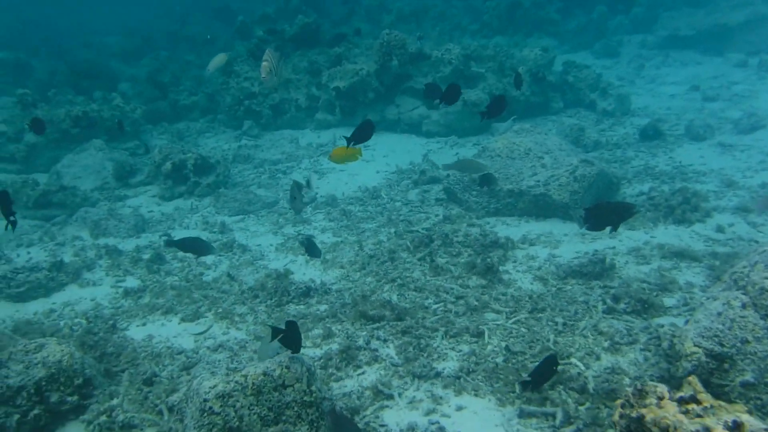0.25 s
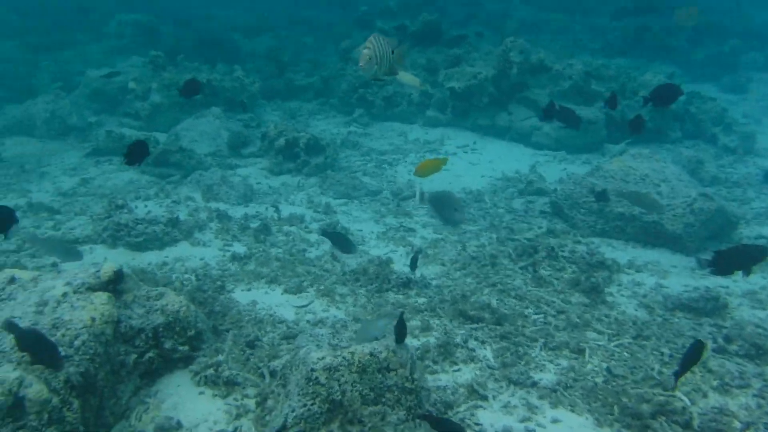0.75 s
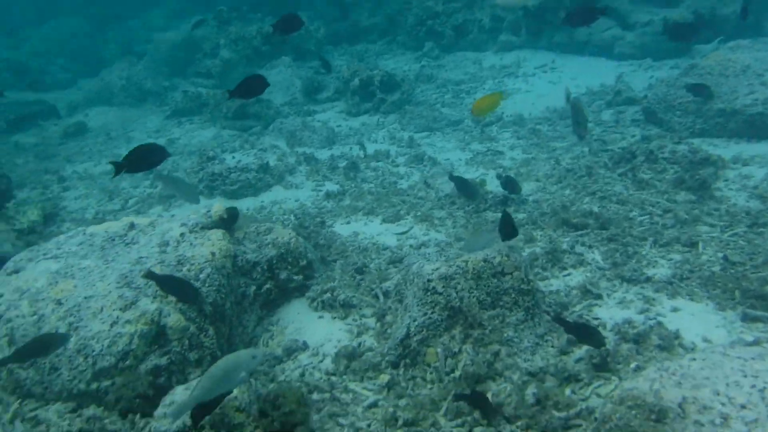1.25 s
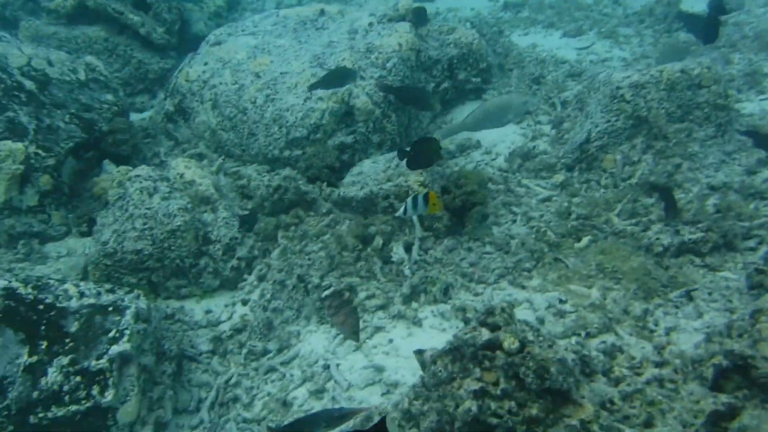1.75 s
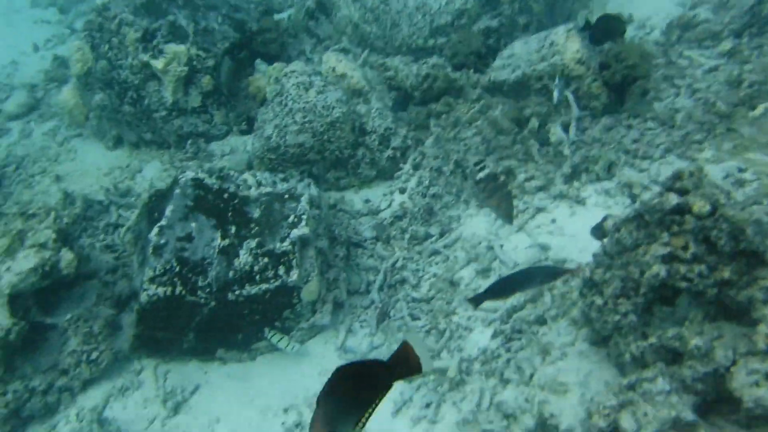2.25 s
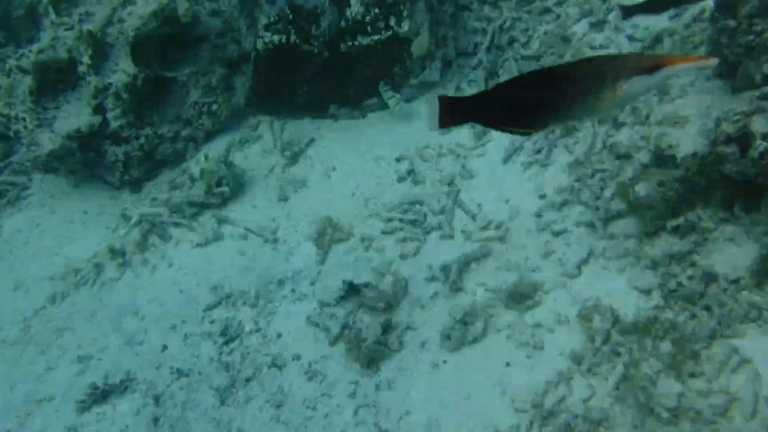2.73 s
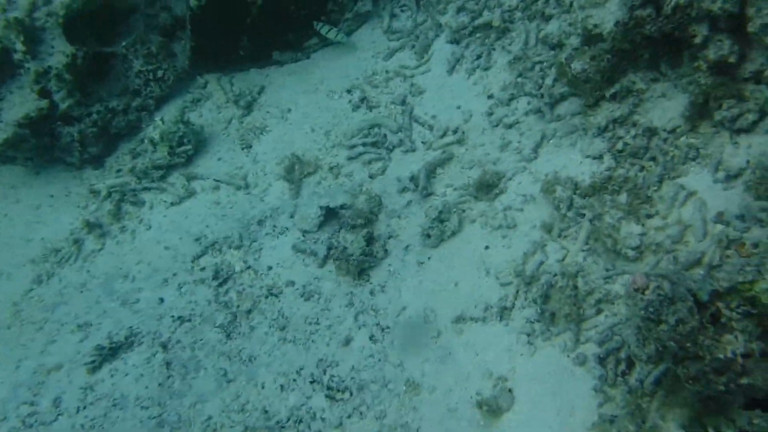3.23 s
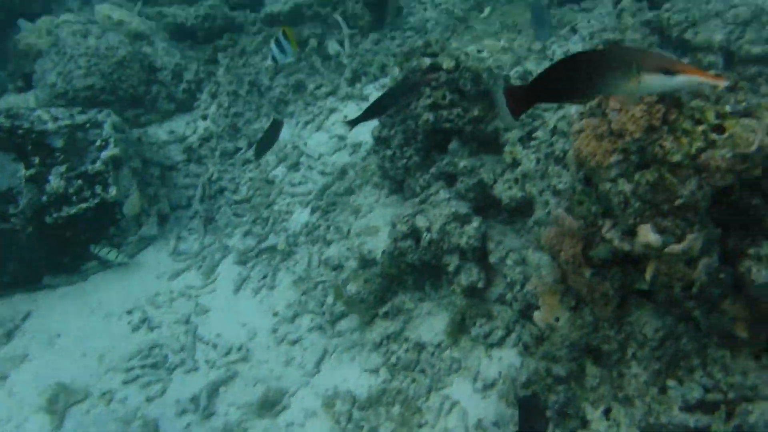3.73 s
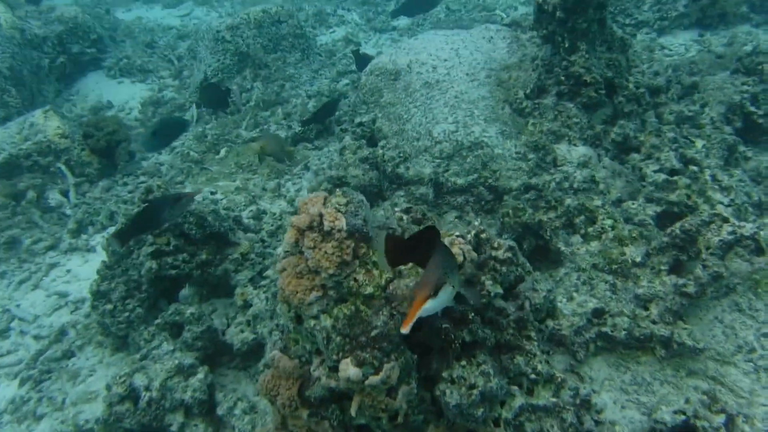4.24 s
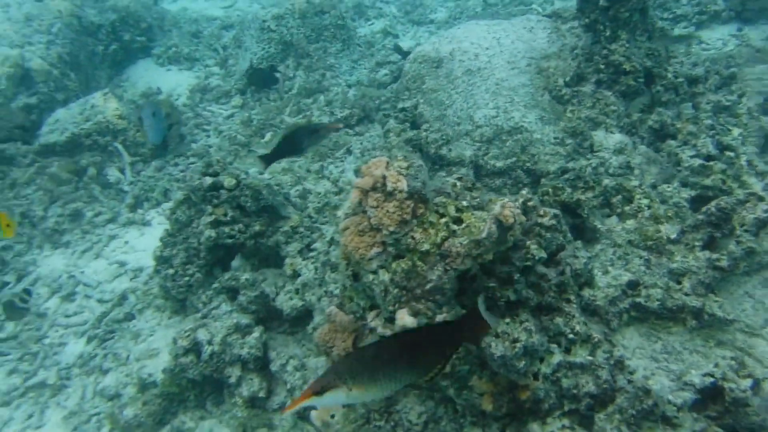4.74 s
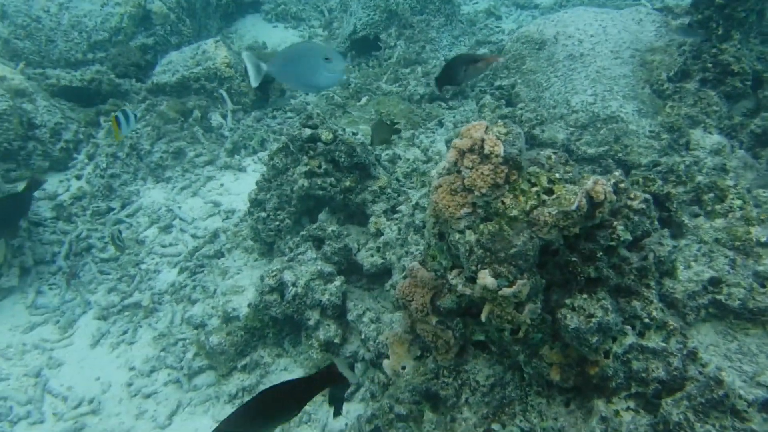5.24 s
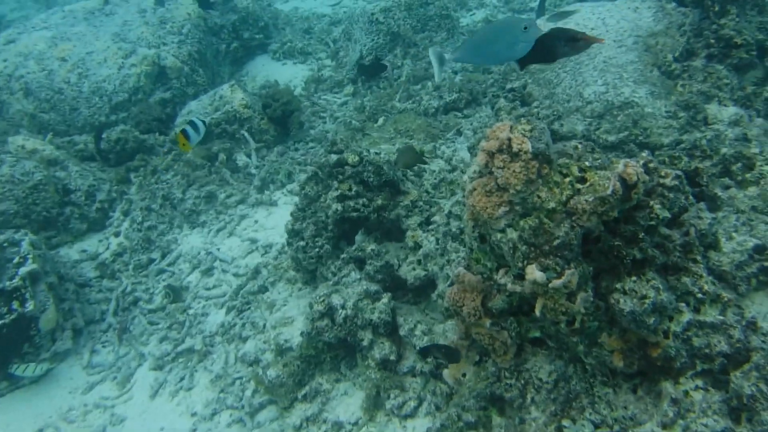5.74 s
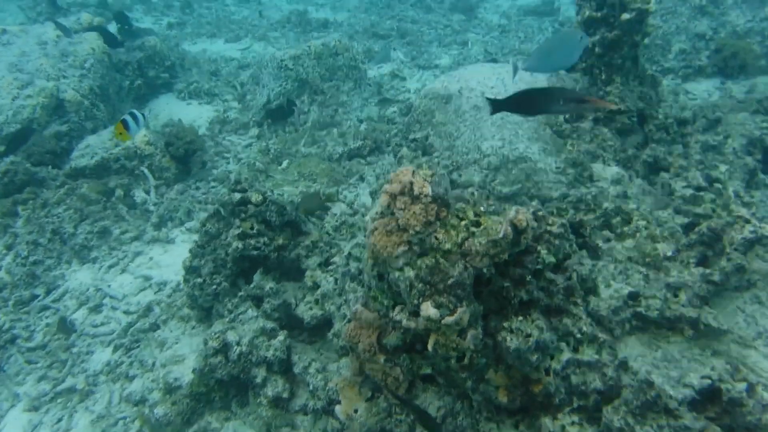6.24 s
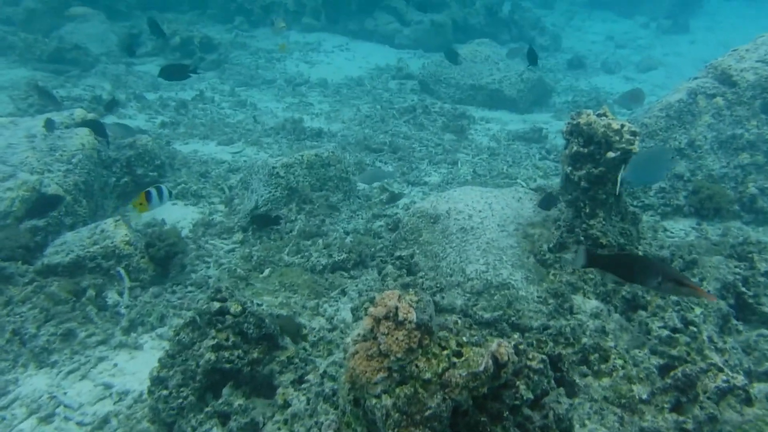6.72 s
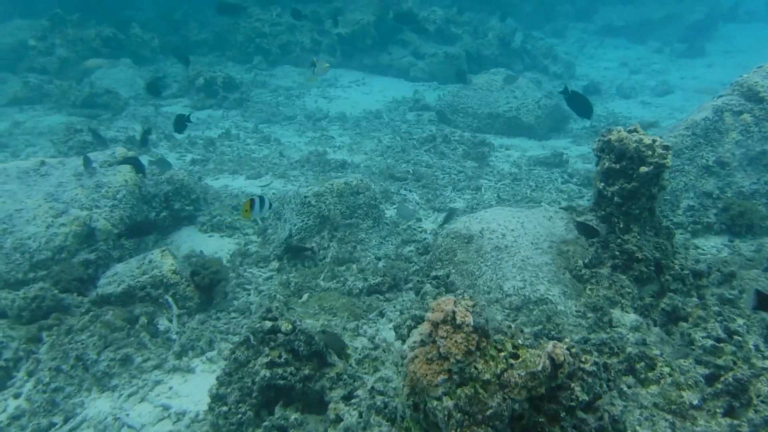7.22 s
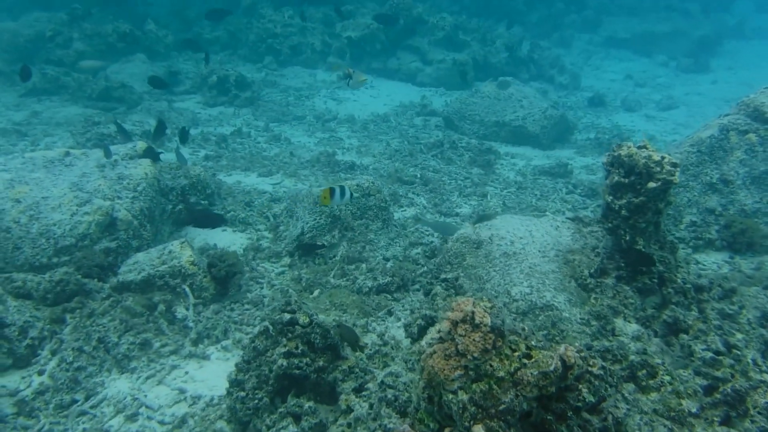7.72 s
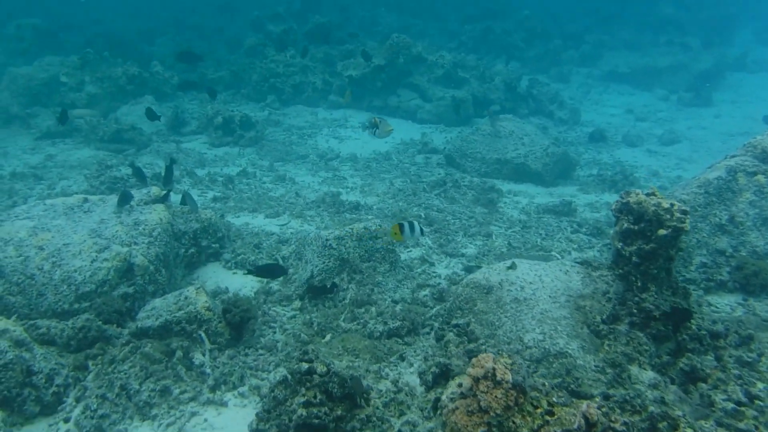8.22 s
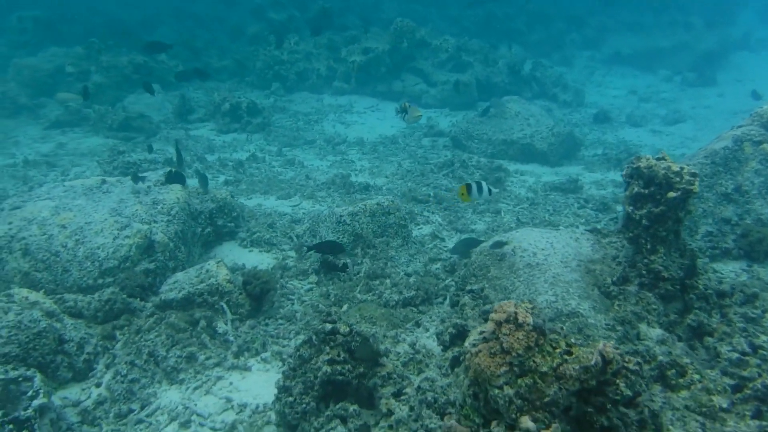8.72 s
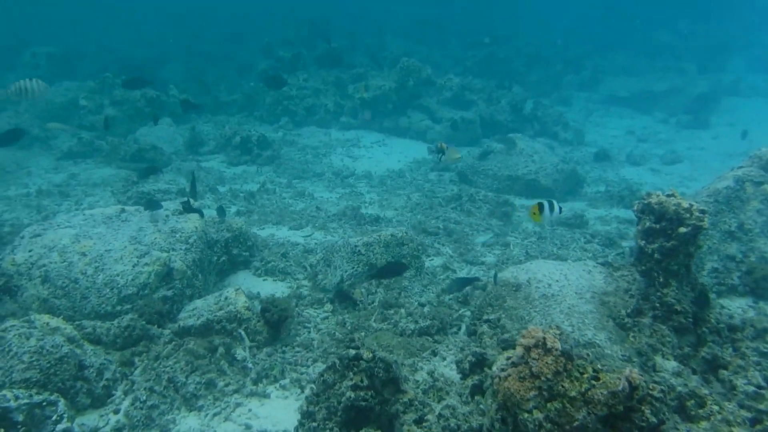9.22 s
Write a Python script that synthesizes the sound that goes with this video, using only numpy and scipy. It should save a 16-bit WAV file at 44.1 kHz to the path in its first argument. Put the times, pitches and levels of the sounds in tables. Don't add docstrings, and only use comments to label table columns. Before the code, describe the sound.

The microphone is sealed inside a camera case underwater, so everything is close, dull and bass-heavy. A lumpy low rumble and a wavering hollow hum, strongest around 330 to 360 Hz, run throughout. A soft shove comes at 0.6 seconds, a small glug at 1.1, and stronger thumps with air knocks from 2.1 to 2.5. At 3.16 a hard double tap clicks on the shell; heavy, overloading blows follow at 3.3 to 3.5, while a grip rubs and slips until 3.9 among bubbling tones. Low swells continue past 4.3. A big blow and deep resonant gulp land at 5.2 to 5.3, then clustered thuds at 6.0 to 6.3. Another boom hits at 7.3, followed by a calmer hum until thumps and a short glug near 9.0, with a smaller one at 9.24. Sparse shrimp snaps, distant crackle, faint hiss and thin whine persist.

```python
import sys
import numpy as np
from scipy import signal
from scipy.fft import rfft, irfft, next_fast_len
from scipy.io import wavfile
from scipy.ndimage import uniform_filter1d

SR = 44100
rng = np.random.default_rng(int(sys.argv[2]) if len(sys.argv) > 2 else 0)


def unload_wav(signal):
    wavfile.write(
        sys.argv[1],
        SR,
        np.round(np.clip(np.atleast_2d(signal).T, -1, 1) * 32767).astype(np.int16),
    )


def makeup_ratio(level_db):
    decades = np.asarray(level_db, float) / 20
    return 10 ** decades


N = 417625
CEILING = 0.83

# start_s, surge_db (large eddies), churn_db (small eddies)
WATER_FLOW = [(0.0, -24.5, -33), (0.7, -29, -47), (1.1, -26.5, -29.5), (1.5, -25, -32), (1.95, -24, -32.5),
              (2.75, -24.5, -37), (3.0, -26.5, -35), (3.6, -22.5, -33.5), (4.3, -20, -32.5),
              (4.9, -23, -39), (5.15, -27, -32), (5.6, -24.5, -26), (5.95, -22, -32.5), (6.55, -28.5, -37),
              (7.4, -18, -32.5), (7.9, -25.5, -44.5), (8.7, -23.5, -41), (9.47, -26, -40.5)]


def evened(x):
    return x / np.sqrt(np.mean(x ** 2) + 1e-20)


def columns(rows):
    s, *values = np.transpose(rows)
    return [np.interp(np.arange(N) / SR, s, v) for v in values]


def add(mix, start_s, sound):
    part = mix[round(start_s * SR):][:len(sound)]
    part += sound[:len(part)]


def lumps(depth_db, ms):
    span = max(int(ms * SR / 1000), 2)
    wander = uniform_filter1d(uniform_filter1d(rng.standard_normal(N), span), span)
    return makeup_ratio(depth_db * evened(wander))


def gusty(depth_db, ms):
    return rng.standard_normal(N) * lumps(depth_db, ms)


def coloured(x, points):
    lower = (points[0][0] / 2, -80)
    upper = (points[-1][0] * 0.99, -90)
    f, db = np.transpose([lower] + list(points) + [upper])
    size = next_fast_len(N)
    hz = np.fft.rfftfreq(size, 1 / SR)
    gain = makeup_ratio(np.interp(np.log(hz + 1), np.log(f + 1), db))
    return evened(irfft(rfft(x, size) * gain, size)[:N])


def resonate(x, hz, width_hz):
    r = np.exp(-np.pi * width_hz / SR)
    if np.ndim(hz) == 0:
        turn = 1
        pole = r * np.exp(2j * np.pi * hz / SR)
    else:
        turn = np.exp(2j * np.pi * np.cumsum(hz) / SR)
        pole = r
    smooth = signal.lfilter([(1 - r) ** 2], [1, -2 * pole, pole ** 2], x / turn + 1e-18)
    return 2 * (turn * smooth).real


def ring(hz, t60_s, rise_s, bend=0.):
    t = np.arange(int(1.3 * t60_s * SR) + 50) / SR
    shape = (1 - np.exp(-t / rise_s)) * makeup_ratio(-60 * t / t60_s)
    return shape / shape.max() * np.sin(2 * np.pi * hz * t * (1 + bend * t / t60_s))


def flow():
    # start_s, signed_peak, pitch_hz
    shove_rows = [(0.608, -0.44, 43.7), (1.593, 0.31, 45), (2.086, 0.5, 71), (2.314, 0.67, 65.6),
                  (2.355, -0.36, 27), (2.433, -0.69, 40), (2.454, 0.38, 37), (3.251, 0.59, 52.5),
                  (3.291, 0.39, 45.7), (3.313, 0.83, 59), (3.396, 0.093, 56), (3.416, -0.95, 75),
                  (3.489, -0.67, 59), (4.338, -0.55, 28), (4.469, 0.33, 31), (4.693, 0.69, 41),
                  (5.036, 0.31, 54.6), (5.239, -0.8, 77.7), (6.007, -0.33, 44.5), (6.048, 0.35, 44),
                  (6.102, -0.29, 54), (6.132, 0.84, 51.6), (6.168, -0.62, 57.4), (6.286, -0.81, 62),
                  (6.325, 0.41, 73), (7.147, -0.48, 44), (7.314, 1, 57), (8.829, 0.51, 55),
                  (8.993, -0.52, 77.6), (9.237, 0.29, 47.6)]
    # start_s, signed_peak, pitch_hz, swings
    rock_rows = [(0.5, 0.25, 24, .5), (3.22, -0.29, 39.4, 0.88), (3.271, 0.31, 48, 0.54),
                 (3.45, -0.34, 62.7, 1.8), (5.8, -0.16, 36, 1), (6.071, -0.35, 41, 0.54),
                 (6.114, -0.27, 98, 1.2), (6.203, 0.32, 53, 0.89), (3.93, 0.23, 30, 0.66),
                 (8.4, 0.26, 35, 0.43), (2.925, 0.2, 36, .5), (2.275, -0.3, 37, .5), (2.393, -.23, 49, .4),
                 (8.81, -0.2, 55, 1.5)]
    shove_swings, wake_s, surge_wake, churn_wake = 0.39, 0.06, 10, 16

    shoves = np.zeros(N)
    t = np.arange(-3000, 3001) / SR
    for s, peak, hz, swings in [(*row, shove_swings) for row in shove_rows] + list(rock_rows):
        add(shoves, s + t[0], peak * np.cos(2 * np.pi * hz * t) * np.exp(-(t * hz / swings) ** 2))

    keep = np.exp(-1 / (wake_s * SR))
    wake = signal.filtfilt([1 - keep], [1, -keep], abs(shoves))
    surge_db, churn_db = columns(WATER_FLOW)
    surge = coloured(gusty(3.1, 53), [(9, -1), (22, 0.5), (45, -7.5), (65, -11)])
    churn = coloured(gusty(5.2, 25), [(55, -5), (75, 2), (125, -6), (180, -9.5)])
    eddies = (1 + surge_wake * wake) * makeup_ratio(surge_db) * surge
    eddies += (1 + churn_wake * wake) * makeup_ratio(churn_db) * churn
    swept = 1 + 8 * uniform_filter1d(abs(shoves), size=1500)
    return shoves + eddies / swept


def hum():
    # start_s, drive_db, brightness_db
    drive_rows = [(0.0, 3, 1), (0.3, 1.5, -2.5), (0.7, 5.5, 4.5), (1.2, 0, 0.5), (1.42, -13, 5),
                  (1.9, -1, 2), (2.4, -5.5, 1.5), (2.7, -12, 1.5), (3.1, -2.5, -0.5), (3.8, -7, 4.5),
                  (4.35, 0.5, 1.5), (5.3, -2.5, 0), (6.1, -1, -0.5), (6.7, -2.5, 1), (7.15, 5, 4.5),
                  (7.55, 0, -1), (8.8, 2, -1.5), (9.47, -4.5, -0.5)]
    # pitch_hz, width_hz, level_db
    hollow_modes = [(362.2, 94, 2.5), (326.5, 84, -8.5)]
    # pitch_hz, width_hz, level_db
    wall_modes = [(229.6, 113, 0)]
    # pitch_hz, width_hz, level_db
    narrow_modes = [(492.3, 50, 0)]
    # pitch_hz, width_hz, level_db
    upper_modes = [(615.3, 103, 7.5), (800, 120, 0.5), (720, 187, -2), (517, 74, -17.5)]
    # pitch_hz, density_db (per Hz)
    wash_spectrum = [(1100, 7), (1400, 10), (1750, 11.5), (2200, 3.5), (2800, -4.5), (4200, -1),
                     (5500, -16.5), (7500, -49)]
    # pitch_hz, density_db (per Hz)
    leak_spectrum = [(850, -1.5), (1000, 1), (1180, 1), (1350, -12)]

    drive_db, bright_db = columns(drive_rows)
    stir_db = columns(WATER_FLOW)[1] + 36
    banks = [(-29.5 + drive_db, hollow_modes),
             (-35 + stir_db, wall_modes),
             (-43 + drive_db - 0.6 * stir_db, narrow_modes),
             (-33.5 + 0.51 * drive_db + 0.2 * bright_db, upper_modes)]
    wash_db = -54 + 0.085 * drive_db + bright_db
    leak_db = -48.5
    out = makeup_ratio(leak_db) * coloured(gusty(1.6, 25), leak_spectrum)
    out += makeup_ratio(wash_db) * coloured(gusty(1.96, 22), wash_spectrum)
    for level_db, modes in banks:
        bank = np.zeros(N)
        for hz, width_hz, db in modes:
            bank += makeup_ratio(db) * evened(resonate(gusty(2.15, 20.5), hz, width_hz))
        out += makeup_ratio(level_db) * evened(bank)
    return out * lumps(1.22, 23.7)


def glugs():
    # start_s, signed_peak, pitch_hz,
    # t60_s
    pockets = [(0.726, -0.15, 208, 0.034), (1.115, -0.45, 245, 0.012), (2.082, -0.64, 232, 0.041),
               (2.309, -0.92, 290, 0.051), (2.315, 0.31, 142, 0.076), (2.53, -0.13, 309, 0.097),
               (2.805, -0.51, 313, 0.037), (3.1591, -0.44, 303, 0.031), (3.359, -0.41, 300, 0.058),
               (3.97, -0.13, 296, 0.067), (4.182, -0.29, 317, 0.074), (4.206, -0.29, 310, 0.12),
               (5.030, -0.33, 220, 0.029), (5.200, -0.56, 234, 0.15), (5.212, -0.4, 132, .06),
               (5.222, 0.42, 170, 0.17), (5.237, -0.89, 236.5, 0.13), (5.256, -0.51, 125, 0.044),
               (5.559, -0.2, 270, 0.048), (5.971, -0.3, 238, 0.027), (6.874, -0.16, 198, 0.052),
               (7.111, -0.13, 256, 0.032), (7.131, -0.29, 267, 0.025), (7.307, -0.22, 212, 0.067),
               (8.434, 0.0089, 316, 0.057), (8.531, -0.36, 229, 0.011), (8.9559, 0.48, 337, 0.024),
               (8.9895, 1.02, 241, 0.021), (9.150, -0.0036, 290, .04), (9.243, -0.38, 238, 0.011)]
    # start_s, peak, pitch_hz, t60_s, rise_s
    gulp = [
        (5.283, 0.76, 122, 0.16, 0.0072),
        (5.2905, 0.56, 245, 0.11, 0.048),
    ]
    # start_s, peak_db, pitch_hz, t60_s
    bubbles = [(0.799, -33, 1040, 0.096), (1.016, -29.5, 4600, .012), (1.034, -31, 1150, 0.031),
               (1.755, -28, 1013, 0.11), (2.8065, -15, 430, 0.014), (3.422, -23, 1150, .04),
               (3.512, -12, 1220, .06), (3.552, -9.5, 1010, .09), (3.595, -19, 1130, .05),
               (3.613, -13, 877, 0.057), (3.676, -11, 786, 0.1105), (3.684, -30.5, 2320, 0.029),
               (3.853, -32.5, 1100, 0.064), (3.856, -38, 2210, 0.038), (3.967, -25, 800, 0.042),
               (4.288, -44, 2400, 0.019), (4.298, -41, 1450, .04), (4.352, -47, 2700, 0.032),
               (4.375, -34, 1500, 0.0068), (4.448, -38, 1510, 0.045), (4.485, -42, 1490, .05),
               (4.498, -36.5, 2300, 0.024), (5.238, -14, 630, 0.014), (5.605, -30, 1010, 0.031),
               (6.163, -40, 2250, 0.019), (8.86, -47.5, 2870, 0.033), (9.318, -45, 2650, 0.066)]

    out = np.zeros(N)
    for s, peak, hz, t60_s in pockets:
        add(out, s, peak * ring(hz, t60_s, 0.00046, bend=-0.094))
        add(out, s, 0.026 * peak * ring(566, 0.013, 0.00091))
    for s, peak, hz, t60_s, rise_s in gulp:
        add(out, s, peak * ring(hz, t60_s, rise_s, bend=-0.1))
    clusters = rng.uniform(-1, 1, (len(bubbles), 7, 2))
    for (s, db, hz, t60_s), cluster in zip(bubbles, clusters):
        for late, size in cluster:
            bubble = ring(hz * (1 + 0.1 * size), 0.59 * t60_s, 0.048 * t60_s, bend=0.011)
            add(out, s + 0.4 * t60_s * abs(late), makeup_ratio(db - 6.5) * bubble)
    return out


def grip():
    # (in the hollow, above level_db)
    slip_rows = [(3.27, -35.5, 766, 5), (3.358, -26.5, 860, 4), (3.472, -32, 1110, 7),
                 (3.515, -15.5, 1200, -4.5), (3.654, -23.5, 865, 4.5), (3.69, -16.5, 780, -7),
                 (3.79, -40, 807, 10.5), (3.86, -34.5, 990, -4), (3.91, -43, 838, 0)]
    # pitch_hz, density_db (per Hz)
    rub_spectrum = [(500, -4), (800, -5), (1250, -7.5), (1600, -12.5), (2450, -23.5), (2700, -34),
                    (6000, -55)]
    # start_s, strength
    knocks = [(2.309, .13), (2.8205, .1), (3.1582, 1), (3.1607, .65), (3.1628, .12), (5.24, .1),
              (7.312, .05), (8.9905, .05)]
    # pitch_hz, level_db, t60_s
    shell_modes = [(664, -12.5, 0.008), (1080, -5, 0.0058), (1460, -5.5, 0.005), (2500, -13, 0.0063),
                   (2920, -15.5, 0.0035), (3900, -18.5, 0.003), (6500, -30, .002)]

    level_db, squeezed_hz, thud_db = columns(slip_rows)
    t = np.arange(N) / SR
    on = (t > slip_rows[0][0]) & (t < slip_rows[-1][0])
    catches = 1 + 2.5 * (rng.random(N) < 1500 / SR)
    slips = np.tanh(0.6 * gusty(2.5, 3) * lumps(1.5, 25) * catches)
    rub = coloured(slips, rub_spectrum) + 0.35 * evened(resonate(slips, squeezed_hz, 300))
    thud = makeup_ratio(thud_db) * evened(resonate(slips, 315, 180))
    out = on * makeup_ratio(level_db) * (lumps(2.74, 10) * evened(rub) + thud)
    for s, strength in knocks:
        for hz, db, t60_s in shell_modes:
            add(out, s, strength * makeup_ratio(db) * ring(hz, t60_s, 0.00054))
    return out


def shrimp():
    # start_s, peak_db, centre_hz
    clear = [(0.0544, -38, 3700), (0.9123, -35, 4300), (0.9303, -34, 5260), (1.0151, -25.5, 4600),
             (1.2156, -40, 3830), (1.3244, -38, 3040), (1.5823, -35.5, 2860), (1.6861, -34, 3600),
             (1.7754, -37, 3470), (1.941, -33.5, 3670), (2.173, -34, 3160), (2.9198, -34.5, 3920),
             (3.2909, -33, 3280), (3.4885, -28, 3070), (3.9779, -27.5, 3800), (4.3286, -27, 4120),
             (4.373, -39, 2730), (4.4538, -34, 2900), (4.8693, -31, 3230), (5.0225, -39.5, 4030),
             (5.5318, -33.5, 3900), (6.1105, -36.5, 3120), (6.2317, -39, 4430), (7.656, -38, 4500),
             (7.9433, -39, 3820), (6.8164, -33.5, 4350), (6.6817, -38, 3030), (7.3911, -32.5, 4070),
             (8.6268, -37, 2950), (9.3561, -39, 3470)]

    out = np.zeros(N)
    t = np.arange(1100) / SR
    chance = rng.uniform([0, -1, -1], 1, size=(24, 3))
    strays = [0, -37.5, 3750] + chance * [N / SR - 0.1, 3.5, 710]
    snaps = np.vstack([clear, strays])
    decay = np.exp(-t / 0.0008) + 0.22 * np.exp(-t / 0.006)
    for s, db, hz in snaps:
        echoes = resonate(rng.standard_normal(len(t)) * decay, hz, 1500)
        add(out, s, makeup_ratio(db) * echoes / abs(echoes).max())

    colony = lumps(4, 50) / 1.2
    struck = rng.random(N) < 312 * colony / SR
    sizes = makeup_ratio(4.0 * np.minimum(rng.exponential(1, N), 3.5)) * struck
    kind = rng.integers(0, 12, N)
    for k, hz in enumerate(np.geomspace(2300, 6500, 12)):
        crackle = signal.oaconvolve(sizes * (kind == k), ring(hz, 30 / hz, 0.0002))[:N]
        out += makeup_ratio(-59.5 - 11 * np.log2(hz / 4000) ** 2) * crackle
    return out


def scene():
    fade = np.clip(np.minimum(np.arange(N), np.arange(N)[::-1]) / 200, 0, 1)
    return (fade * (flow() + hum() + glugs() + grip() + shrimp()))[None]


def low_pass(x):
    return signal.sosfilt(signal.butter(12, 16530, fs=SR, output="sos"), x)


def record(dry):
    # pitch_hz, density_db (per Hz)
    hiss_spectrum = [(2940, -32), (5000, -9), (6160, -9.5), (12700, -11), (14200, -13.5), (16000, -11)]
    # pitch_hz, level_db (rms)
    whine_tones = [(13631, -83), (13690, -76), (13749, -85), (13808, -88)]
    hiss_db, edge_hz = -61.5, 15750

    t = np.arange(N) / SR
    capacitor = signal.butter(1, 4, "high", fs=SR)
    clipped = signal.lfilter(*capacitor, np.clip(dry, -CEILING, CEILING))
    hiss = makeup_ratio(hiss_db) * coloured(gusty(0.86, 10), hiss_spectrum)
    whine = sum(np.sqrt(2) * makeup_ratio(db) * np.sin(2 * np.pi * hz * t) for hz, db in whine_tones)
    spectrum = rfft(np.clip(clipped, -CEILING, CEILING) + hiss + whine)
    spectrum = spectrum * (np.fft.rfftfreq(N, 1 / SR) < edge_hz)
    return low_pass(irfft(spectrum, N))


dry = scene()
out = record(dry)
unload_wav(out)
```